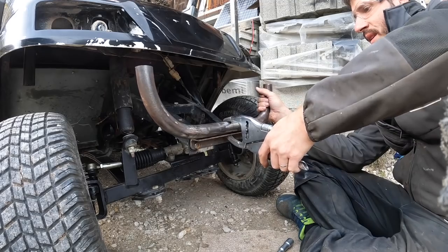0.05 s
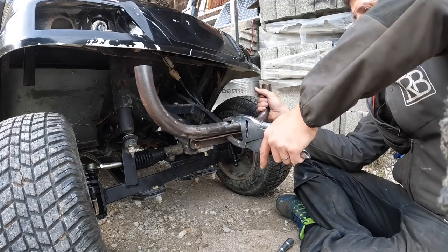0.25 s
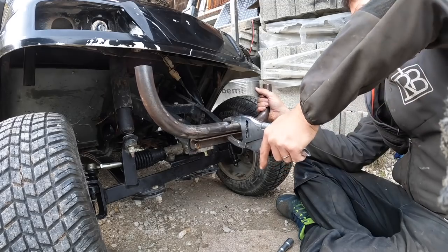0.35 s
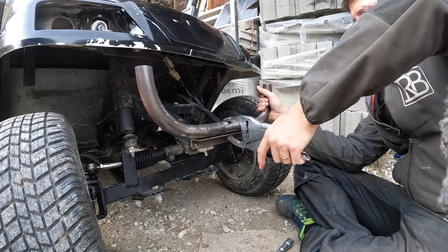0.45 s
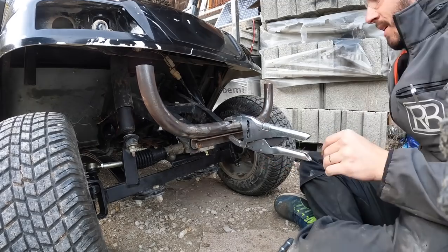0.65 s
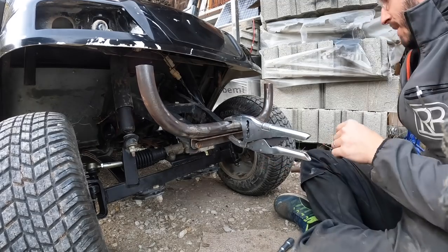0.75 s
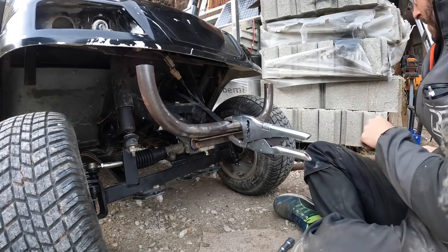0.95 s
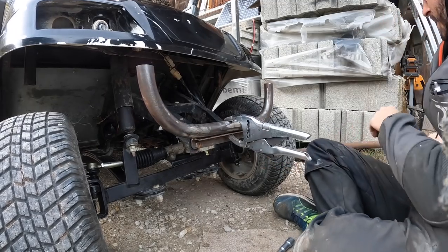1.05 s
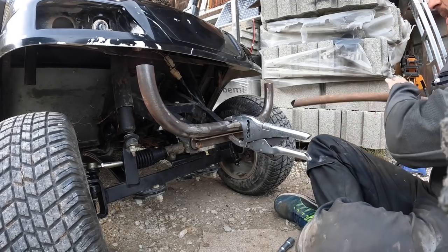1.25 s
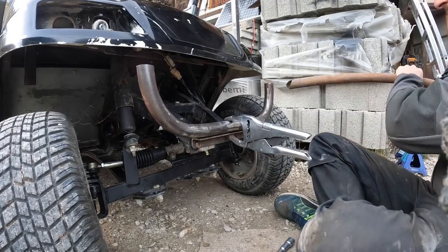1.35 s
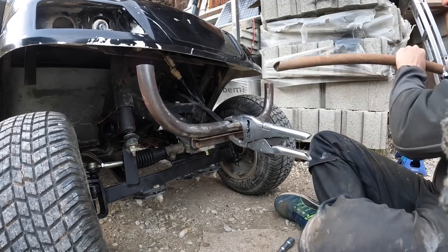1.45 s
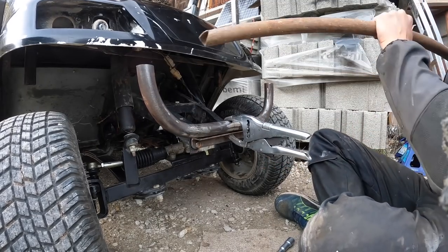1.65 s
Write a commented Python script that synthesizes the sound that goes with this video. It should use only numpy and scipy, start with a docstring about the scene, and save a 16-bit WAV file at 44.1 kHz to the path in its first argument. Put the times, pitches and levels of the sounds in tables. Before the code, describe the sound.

Locking pliers snap shut on a steel tube at 0.23 s: a loud, bright crack with brief ringing and low chassis boom. A softer, duller knock follows at 0.34 s. After faint air, a soft scuff at 0.64 s leads into cloth rustle and low air rumble from 0.7 s. A double dull thud lands around 0.85 s; a faint clink at 1.33 s, a tick at 1.42 s, then a light, hissy pipe scrape around 1.5 s. Close, dry.

```python
"""Locking pliers on an exhaust tube

Locking pliers snap shut on a steel tube under a small vehicle, then, let go, knock against it: noise bands
and decaying sines sound pliers, tube and chassis. Work clothes rustle (grainy noise) and something lands on
the ground with a dull thud. A loose pipe is drawn up with a light scrape: friction noise wakes resonators.
Faint background air throughout; close and nearly mono, with no room modelled."""
import sys
import numpy as np
from scipy import signal
from scipy.fft import rfft, irfft
from scipy.io import wavfile

SR = 44100
rng = np.random.default_rng(int(sys.argv[2]) if len(sys.argv) > 2 else 0)


def materialize(psi):
    """Save the field psi as 16-bit PCM at rate SR to the path in sys.argv[1].

    A 1-D psi becomes a single channel; in a 2-D psi each row is a channel.
    """
    bounded = np.clip(np.atleast_2d(psi).T, -1, 1)
    quanta = np.round(bounded * 32767).astype(np.int16)
    wavfile.write(sys.argv[1], SR, quanta)


N = 74970
TIME = np.arange(N) / SR
FREQS = np.maximum(np.fft.rfftfreq(N, 1 / SR), 1)
PIVOT_HZ = 3000   # brightness tilts turn about this frequency

# Modes of the clamped tube. Each row: frequency in Hz, level in dB, t60 in seconds.
TUBE_MODES = [(1530, -51, .22), (2342, -44, .32), (2449, -41, .28), (2520, -46, .27), (2610, -50, .28),
              (2692, -50, .33), (2790, -50, .26), (3515, -47, .14), (4185, -50, .33), (4942, -56, .2),
              (6094, -45, .13), (8436, -37, .15)]
# Modes of the chassis. Each row: frequency in Hz, level in dB, t60 in seconds.
CHASSIS_MODES = [(112.9, -24.5, 0.2), (153, -29, 0.19), (180.4, -30.5, .38), (193.3, -11, .1),
                 (334.3, -40, 0.095), (507.6, -32, 0.15), (650, -36, 0.13)]
CHASSIS_RISE_S = 0.0077
# Faint tail of both blows. Each row: frequency in Hz, level per octave in dB, t60 in seconds.
TAIL_BANDS = [(49.7, -67.5, 0.89), (121, -32.5, 0.35), (220, -46, .4), (600, -50, 0.37), (1500, -46.5, .24),
              (2920, -40.5, 0.2), (7000, -56.5, 0.54), (14000, -61, 0.12)]
TAIL_RISE_S = 0.008
CLOTH_GRAINS_PER_S, CLOTH_GRAIN_SHARE = 3700, 0.12


def from_db(db):
    """Decibels to gain."""
    return 10 ** (np.asarray(db) / 20)


def rms_one(x):
    """Scale to unit rms."""
    return x / np.sqrt(np.mean(x ** 2) + 1e-20)


def curve(rows):
    """Gain over time, linear in dB between (s, dB) rows."""
    return from_db(np.interp(TIME, *np.transpose(rows)))


def at_hz(rows, hz, axis=1):
    """Interpolate one column of a table on a log-frequency axis."""
    rows = np.array(rows)
    return np.interp(np.log(hz), np.log(rows[:, 0]), rows[:, axis])


def tilt_gain(tilt_db, hz):
    """Gain of a brightness tilt in dB per octave about PIVOT_HZ."""
    return from_db(tilt_db * np.log2(hz / PIVOT_HZ))


def colour(white, spectrum):
    """Shape unit white noise to a spectrum of levels per octave in dB."""
    # power per octave to power per Hz; the conversion is held constant below 20 Hz
    octave_to_hz = np.sqrt(SR / 2 / np.log(2) / np.maximum(FREQS, 20))
    gain = from_db(at_hz(spectrum, FREQS)) * octave_to_hz
    return irfft(rfft(white) * gain, N)


def grainy(per_s, share, size_db=3.5):
    """Friction: tiny slips of uneven size over smooth hiss, mixed by power share to rms 1."""
    hits = rng.random(N) < per_s / SR
    signs = rng.choice([-1, 1], N)
    sizes = from_db(size_db * np.minimum(rng.exponential(1, N), 4))
    slips = rms_one(hits * signs * sizes)
    return np.sqrt(share) * slips + np.sqrt(1 - share) * rng.standard_normal(N)


def resonate(x, hz, width_hz):
    """One resonance, applied twice for steep sides (width is per pass); rms 1."""
    b, a = signal.iirpeak(hz, hz / width_hz, fs=SR)
    once = signal.lfilter(b, a, x)
    return rms_one(signal.lfilter(b, a, once))


def dying(start_s, t60_s, rise_s):
    """Envelope of a blow: quick rise, exponential decay."""
    age_s = np.maximum(TIME - start_s, 0)
    return (1 - np.exp(-age_s / rise_s)) * np.exp(-np.log(1000) * age_s / t60_s)


def damped(start_s, damp_s):
    """Full level until start_s, then exponential release with time constant damp_s."""
    return np.exp(-np.maximum(TIME - start_s, 0) / damp_s)


def clatter(start_s, table, tilt_db=0, rise_s=0.00053):
    """Countless close modes struck at once: half-octave noise bands, each with its own decay."""
    noise = rfft(colour(rng.standard_normal(N), table))
    out = 0
    edges_hz = 22 * 2 ** np.arange(0, 10.1, .5)
    for low, high in zip(edges_hz, edges_hz[1:]):
        hz = np.sqrt(low * high)
        band = irfft(noise * ((FREQS >= low) & (FREQS < high)), N)
        envelope = dying(start_s, at_hz(table, hz, axis=2), rise_s)
        out = out + band * tilt_gain(tilt_db, hz) * envelope
    return out


def ring(start_s, modes, tilt_db=0, rise_s=0.0006):
    """Clear modes of a struck body: decaying sines."""
    out = 0
    for hz, db, t60_s in modes:
        tone = np.sin(2 * np.pi * hz * (TIME - start_s))
        out = out + from_db(db) * tilt_gain(tilt_db, hz) * dying(start_s, t60_s, rise_s) * tone
    return out


def background_air():
    """Steady coloured noise whose level swells and dips."""
    # Each row: frequency in Hz, level per octave in dB.
    air_spectrum = [(25, -65), (100, -66), (400, -68), (1200, -63.5), (3000, -68.5), (8000, -67),
                    (12000, -70.5), (15500, -73.5)]
    # Each row: time in seconds, gain in dB.
    air_level = [(0, -1), (.21, 2), (.3, 4), (.48, -10), (.58, -1), (.68, -4), (1.7, 5.5)]
    return curve(air_level) * colour(rng.standard_normal(N), air_spectrum)


def snap():
    """The toggle goes over centre and the jaws bite: pliers, tube and chassis all sound."""
    # Toggle, then jaws. Each row: start in seconds, clatter gain in dB, clatter tilt in dB per octave,
    # ring gain in dB.
    contacts = [(0.2253, 3.5, 0.5, -4), (0.23, 0, 5.5, 3)]
    # Dense clatter. Each row: frequency in Hz, level per octave in dB, t60 in seconds.
    snap_bands = [(100, -66.5, 0.16), (356, -37.5, 0.35), (900, -23, 0.083), (1450, -20.5, 0.085),
                  (1920, -29.5, .11), (2500, -18, .11), (5450, -20.5, 0.066), (8100, -15, 0.072),
                  (8500, -30, 0.088), (13500, -22, 0.044), (15500, -33, .05)]
    # Modes of the pliers. Each row: frequency in Hz, level in dB, t60 in seconds.
    pliers_modes = [(943, -19, 0.095), (1748, -27.5, 0.092), (2520, -26, .1), (2590, -30, 0.045),
                    (2781, -28.5, 0.15), (3560, -19, 0.09), (3825, -15, .065), (3960, -23.5, 0.035),
                    (4470, -33, .14), (5270, -19, 0.066), (6040, -30.5, .11), (8200, -28, 0.047),
                    (7814, -15.5, .07), (11470, -32.5, .06)]
    hold_s, damp_s = 0.038, 0.012
    boom_db, boom_tilt_db = 4.5, 2.5
    toggle_s, bite_s = contacts[0][0], contacts[1][0]

    crack = 0
    for start_s, db, tilt_db, ring_db in contacts:
        crack = crack + from_db(db) * clatter(start_s, snap_bands, tilt_db)
        crack = crack + from_db(ring_db) * ring(start_s, pliers_modes)
    crack = crack * damped(toggle_s + hold_s, damp_s)
    tube = ring(bite_s, TUBE_MODES)
    boom = from_db(boom_db) * ring(bite_s, CHASSIS_MODES, boom_tilt_db, rise_s=CHASSIS_RISE_S)
    return crack + tube + boom + clatter(toggle_s, TAIL_BANDS, rise_s=TAIL_RISE_S)


def knock():
    """A softer, duller blow on the same tube, with more boom from the chassis."""
    # Dense clatter. Each row: frequency in Hz, level per octave in dB, t60 in seconds.
    knock_bands = [(100, -43.5, 0.27), (306, -34, 0.29), (600, -37.5, 0.38), (1230, -36, 0.13),
                   (1750, -32.5, 0.14), (2050, -31.5, .12), (2610, -22.5, 0.16), (3570, -38.5, 0.13),
                   (4200, -25.5, 0.085), (7640, -32, 0.059), (10000, -49.5, 0.086), (15000, -53, 0.093)]
    # Jaws and handles rattling on the tube. Each row: frequency in Hz, level in dB, t60 in seconds.
    jaw_modes = [(1520, -30.5, 0.14), (1770, -22.5, 0.072), (1960, -35.5, 0.15), (2275, -31, 0.067),
                 (2934, -39.5, 0.11), (4505, -35, 0.14)]
    start_s, hold_s, damp_s = 0.3405, 0.033, 0.0055
    jaw_db, tube_db, tube_tilt_db = -1.5, -3.5, -8.5
    boom_db, boom_lag_s = 1, 0.00385
    tail_db, tail_tilt_db = -5.5, -3

    crack = clatter(start_s, knock_bands, rise_s=0.0018) + from_db(jaw_db) * ring(start_s, jaw_modes)
    crack = crack * damped(start_s + hold_s, damp_s)
    tube = from_db(tube_db) * ring(start_s, TUBE_MODES, tube_tilt_db)
    boom = from_db(boom_db) * ring(start_s + boom_lag_s, CHASSIS_MODES, rise_s=CHASSIS_RISE_S)
    tail = from_db(tail_db) * clatter(start_s, TAIL_BANDS, tail_tilt_db, rise_s=TAIL_RISE_S)
    return crack + tube + boom + tail


def scuff():
    """A soft scuff before the sleeves move: grainy friction noise."""
    # Each row: time in seconds, gain in dB.
    scuff_level = [(.55, -49.5), (.62, -23), (.64, 2.5), (.69, -1.5), (.73, -41.5)]
    # Each row: frequency in Hz, level per octave in dB.
    scuff_spectrum = [(300, -84), (950, -57.5), (1800, -68.5), (5000, -83.5)]
    return curve(scuff_level) * colour(grainy(CLOTH_GRAINS_PER_S, CLOTH_GRAIN_SHARE), scuff_spectrum)


def sleeves():
    """Cloth rubs on cloth: mostly smooth friction noise, following the effort."""
    # Each row: time in seconds, gain in dB.
    rustle_level = [(0, -40), (.6, -29), (.685, -22), (.715, 1), (.76, -5.5), (.79, 3.5), (.825, 1),
                    (.85, -5), (.93, -4), (.98, -2.5), (1.03, -6), (1.15, -5), (1.28, -4.5), (1.33, -5.5),
                    (1.38, -11), (1.46, -5), (1.6, -8), (1.7, -13.5)]
    # Each row: frequency in Hz, level per octave in dB.
    rustle_spectrum = [(40, -71.5), (150, -67), (400, -58), (900, -54), (2000, -55), (5500, -52),
                       (9000, -53.5), (12000, -61.5), (15500, -66)]
    return curve(rustle_level) * colour(grainy(CLOTH_GRAINS_PER_S, CLOTH_GRAIN_SHARE), rustle_spectrum)


def draught():
    """The moving body pushes air past the microphone: very low noise."""
    # Each row: frequency in Hz, level in dB (per octave from 20 Hz up).
    draught_spectrum = [(1, -34), (4, -31.5), (9, -41.5), (20, -63), (50, -71), (200, -110)]
    # Each row: time in seconds, gain in dB.
    draught_level = [(0, -27), (.68, -20), (.705, 9), (.9, 3.5), (1.2, -2.5), (1.45, -12), (1.7, 2)]
    return curve(draught_level) * colour(rng.standard_normal(N), draught_spectrum)


def ticks():
    """Small ticks of handling: very short clatter."""
    # Each row: start in seconds, gain in dB.
    tick_starts = [(0.8237, -1), (1.4189, 3.5)]
    # Each row: frequency in Hz, level per octave in dB, t60 in seconds.
    tick_bands = [(100, -63, 0.035), (800, -52, 0.061), (2800, -51, 0.024), (3470, -32.5, 0.013),
                  (4350, -40.5, 0.0091), (5600, -46, .015), (14000, -60, .01)]
    return sum(from_db(db) * clatter(start_s, tick_bands) for start_s, db in tick_starts)


def thuds():
    """A weight lands on packed earth and settles: soft noise impact plus low modes."""
    # Each row: start in seconds, impact gain in dB, rise in seconds, impact tilt in dB per octave,
    # ring gain in dB.
    landings = [(0.8440, 0.5, 0.00057, -0.5, 1.5), (0.890, 2.5, 0.0066, 3.5, -9)]
    # Soft impact. Each row: frequency in Hz, level per octave in dB, t60 in seconds.
    puff_bands = [(35, -57, 0.74), (99, -37.5, 0.63), (283, -35, 0.27), (467, -37, 0.22), (740, -28, 0.078),
                  (1200, -39.5, 0.082), (2200, -52, 0.18), (5000, -85, .05)]
    # Modes of the thud. Each row: frequency in Hz, level in dB, t60 in seconds.
    ground_modes = [(52.9, -28.5, 0.93), (110.6, -28, 0.36), (137.5, -26, .19), (257.2, -47.5, 0.83),
                    (287, -29, 0.126), (693, -21.5, 0.034), (838, -24.5, 0.031)]
    ring_extra_rise_s = 0.00053
    out = 0
    for start_s, db, rise_s, tilt_db, ring_db in landings:
        out = out + from_db(db) * clatter(start_s, puff_bands, tilt_db, rise_s=rise_s)
        out = out + from_db(ring_db) * ring(start_s, ground_modes, rise_s=ring_extra_rise_s + rise_s)
    return out


def sliding_pipe():
    """The loose pipe slides: friction hisses, wakes its resonances and squeaks thinly."""
    # Sliding pressure. Each row: time in seconds, gain in dB.
    scrape_level = [(1.25, -50), (1.34, -30), (1.39, -37), (1.47, -9.5), (1.503, -15.5), (1.523, 5),
                    (1.56, -2), (1.618, -2), (1.635, -22), (1.7, -29)]
    # Each row: frequency in Hz, level per octave in dB.
    scrape_spectrum = [(300, -74), (1500, -64), (3500, -53), (5500, -49), (6900, -54), (8200, -41.5),
                       (10000, -55.5), (15500, -57)]
    # Each row: frequency in Hz, width per filter pass in Hz, level in dB.
    pipe_resonances = [(1940, 30, -58), (2150, 44, -59.5), (2646, 44, -60), (8300, 80, -58.5),
                       (8160, 40, -56)]
    # Each row: time in seconds, squeak level in dB.
    squeak_level = [(1.2, -130), (1.26, -61), (1.3, -49.5), (1.345, -65), (1.39, -70), (1.49, -60),
                    (1.53, -50), (1.62, -57), (1.7, -66)]
    slips = grainy(per_s=4200, share=0.71)
    body = colour(slips, scrape_spectrum)
    for hz, width_hz, db in pipe_resonances:
        body = body + from_db(db) * resonate(slips, hz, width_hz)
    squeak = curve(squeak_level) * resonate(slips, hz=7540, width_hz=99)
    return curve(scrape_level) * body + squeak


def clink():
    """The pipe grazes something as it is lifted: a few soft-onset modes."""
    # Each row: frequency in Hz, level in dB, t60 in seconds.
    clink_modes = [(1120, -47.5, 0.19), (1480, -50, 0.15), (5080, -52, 0.12), (6230, -51, 0.091)]
    return ring(1.333, clink_modes, rise_s=.003)


def scene():
    """Sum all sources; the two channels differ slightly in the treble."""
    blows = snap() + knock() + thuds()
    handling = scuff() + sleeves() + draught() + ticks()
    mid = background_air() + blows + handling + sliding_pipe() + clink()
    side = from_db(-38) * np.diff(mid, prepend=0)   # sample difference favours treble
    return np.array([mid + side, mid - side])


def record(dry):
    """Peaks are rounded by tanh, then a steep low-pass cuts the top."""
    peak, cutoff_hz = 1.3, 16000
    rounded = peak * np.tanh(dry / peak)
    low_pass = signal.ellip(10, .1, 80, cutoff_hz, fs=SR, output="sos")
    return signal.sosfilt(low_pass, rounded)


dry = scene()
out = record(dry)
materialize(out)
```